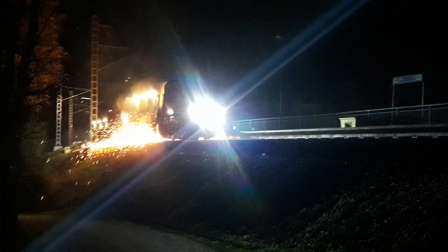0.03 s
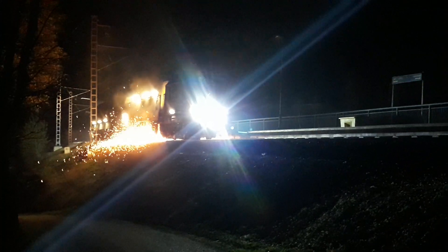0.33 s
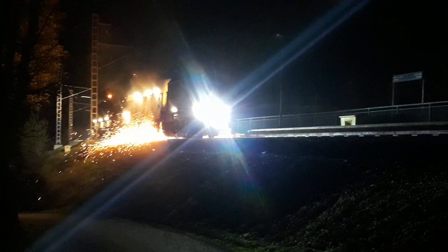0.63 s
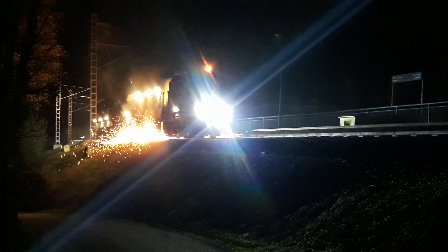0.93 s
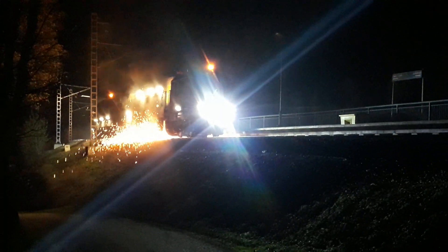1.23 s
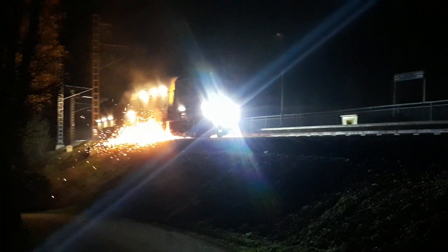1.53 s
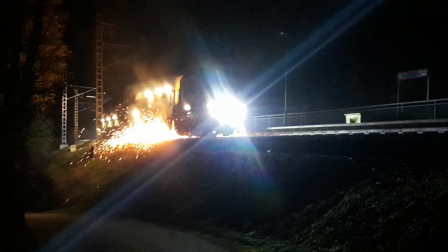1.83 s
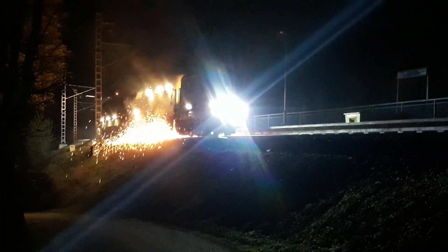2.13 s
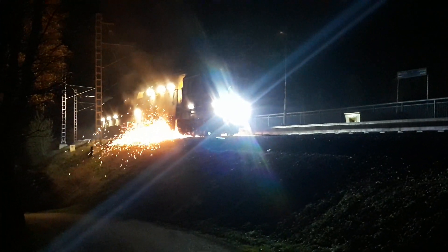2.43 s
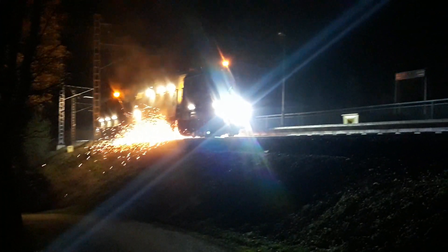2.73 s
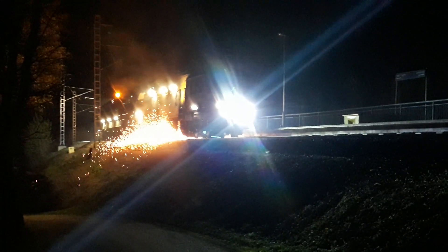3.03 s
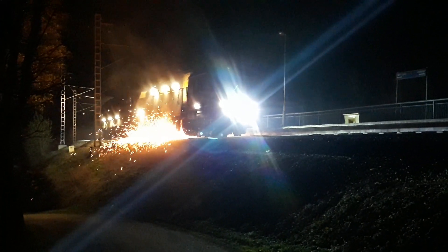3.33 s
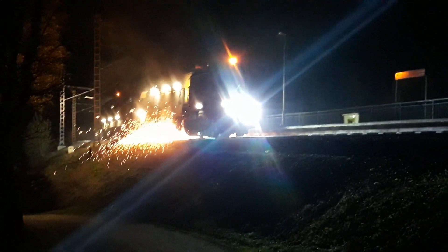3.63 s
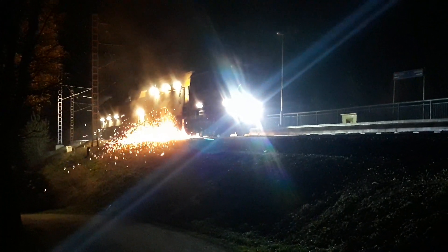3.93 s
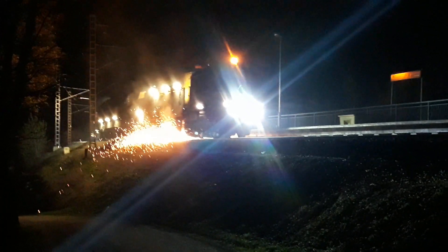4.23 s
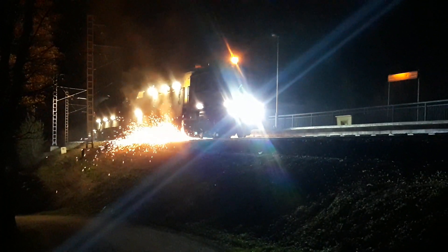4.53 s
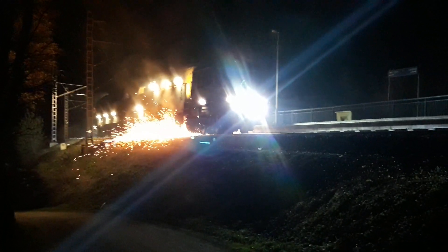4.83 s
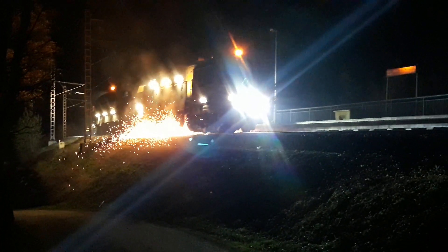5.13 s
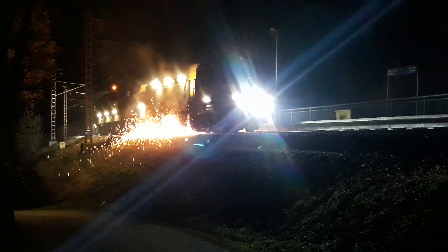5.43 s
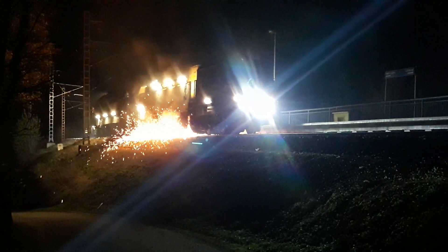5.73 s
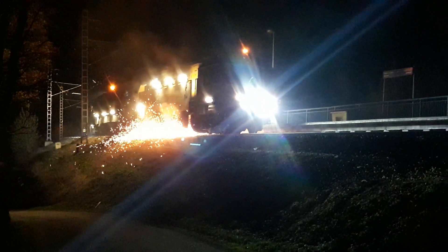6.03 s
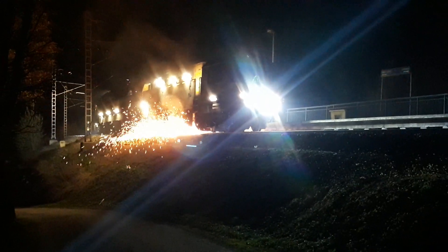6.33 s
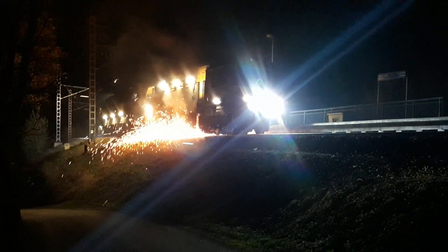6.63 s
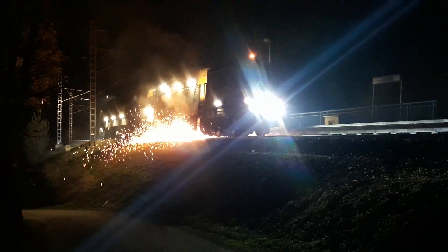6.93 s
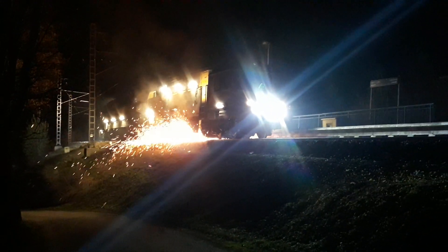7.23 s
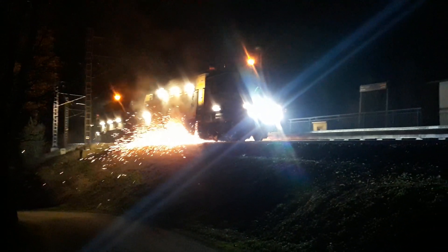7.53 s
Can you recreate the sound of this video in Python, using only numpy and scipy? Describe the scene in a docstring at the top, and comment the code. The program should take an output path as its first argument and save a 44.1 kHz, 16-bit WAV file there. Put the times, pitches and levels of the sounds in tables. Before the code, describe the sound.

A rail grinding train creeps along outdoors, heard from some tens of metres away. Its diesel rattles and whines over humming motors, while the stones make a loud, steady, ringing roar on the rail under a faint fizz of sparks. Thin squeals come and go. Three times a stone bites and the rail rings briefly. After the second bite the engine races slightly, and the grinding peaks near the end.

```python
"""A rail grinding train creeps along an embankment at night, some tens of metres away.
From the start its diesel rattles and whines, a generator and the spindle motors hum, and the stones
roar on the rail under a faint fizz of sparks. Thin squeals come and go; at 2.5 s a stone bites and the
rail sings out. A second bite at 5 s leads into the longest squeal, while the diesel races and its turbo
spools up. Near 7 s the stones bear down hardest, with one more squeal and then a last bite."""
import sys
import numpy as np
from scipy import signal
from scipy.fft import rfft, irfft, next_fast_len
from scipy.io import wavfile
from scipy.ndimage import uniform_filter1d, minimum_filter1d

SR = 44100
rng = np.random.default_rng(int(sys.argv[2]) if len(sys.argv) > 2 else 0)


def dump_mix(stems):
    """Bounce the given channels to the path in sys.argv[1] as a 16-bit WAV at rate SR."""
    frames = np.atleast_2d(stems).T  # one column per channel
    limited = np.clip(frames, -1, 1)  # hard clip at full scale
    pcm = np.round(limited * 32767).astype(np.int16)
    wavfile.write(sys.argv[1], SR, pcm)


N = 333837
T = np.arange(N) / SR

# diesel speed: (time [s], working cycles [1/s])
ENGINE_SPEED = [(0, 15.68), (.25, 15.68), (.6, 15.745), (1.26, 15.7), (1.85, 15.535), (2.3, 15.545),
                (2.78, 15.61), (3.22, 15.53), (3.72, 15.86), (4.1, 15.8), (4.95, 15.84), (5.48, 16.22),
                (5.8, 16.13), (6.3, 15.81), (6.75, 15.66), (7.07, 15.75), (7.57, 15.62)]
# the diesel's standout harmonics: (multiple of the cycle rate, level [dB])
ENGINE_HARMONICS = [(3, -61), (4, -55.5), (6, -35.5), (12, -41.5), (18, -49), (28, -51.5), (31, -39.5),
                    (34, -39), (36, -38.5), (40, -35.5), (43, -44), (44, -33), (59, -38.5), (70, -45.5),
                    (115, -40.5)]
# whines that swell once as the train creeps by:
# multiple of the cycle rate -> (resting level [dB], middle [s], half length [s], rise [dB])
ENGINE_WHINES = {9: (-46.5, 5.5, 2, 7), 42: (-37, 3.5, 3, 9.5), 45: (-37.5, 2.6, 1.8, 4.5),
                 46: (-39.5, 2, 2.2, 10), 48: (-34, 5, 0.4, 8), 50: (-37.5, 3.5, 2, 4),
                 60: (-44.5, 6, 1.7, 6.5), 63: (-42.5, 5.5, 2, 9), 69: (-46.5, 5, 1.5, 9),
                 80: (-38, 5, 1, 6.5), 86: (-37.5, 2, 1.5, 6.5)}
GEAR_MULTIPLE = 78  # of the cycle rate


def amp(db):
    """Decibels to gain."""
    return 10 ** (np.asarray(db) / 20)


def unit(x):
    """Scales to rms 1."""
    return x / np.sqrt(np.mean(abs(x) ** 2) + 1e-20)


def curve(rows):
    """A time table as an automation curve, one value a sample."""
    return np.interp(T, *np.transpose(rows))


def read(points, hz):
    """Reads a spectrum table on a log-frequency axis."""
    f, value = np.transpose(points)
    return np.interp(np.log(hz + 1), np.log(f + 1), value)


def noise(spectrum):
    """Noise of rms 1, coloured by the given spectrum."""
    size = next_fast_len(N)
    eq = amp(read(spectrum, np.fft.rfftfreq(size, 1 / SR)))
    return unit(irfft(rfft(rng.standard_normal(N), size) * eq)[:N])


def drift(rate_hz, size=2048):
    """Slow random modulation of rms 1, with little faster than rate_hz."""
    hz = np.fft.rfftfreq(size, T[-1] / size)
    slow = irfft(rfft(rng.standard_normal(size)) / (1 + (hz / rate_hz) ** 2))
    return np.interp(T, np.linspace(0, T[-1], size), unit(slow))


def swell(rest_db, middle_s, half_s, rise_db):
    """Gain that rises from its resting level, holds, and sinks back."""
    return amp(rest_db + rise_db * np.exp(-((T - middle_s) / half_s) ** 4))


def angle(hz):
    """Phase of something that turns hz times a second."""
    return 2 * np.pi * np.cumsum(hz * np.ones(N)) / SR


def tone(phase, scatter, rate_hz):
    """A wavering tone of rms near 1: direct sound plus a share, scatter, that comes by shifting paths."""
    phase = (phase + rng.uniform(0, 2 * np.pi)) % (2 * np.pi)
    in_phase = np.sqrt(2 * (1 - scatter)) + np.sqrt(scatter) * drift(rate_hz)
    return in_phase * np.cos(phase) + np.sqrt(scatter) * drift(rate_hz) * np.sin(phase)


def resonate(x, hz, width_hz):
    """A two-pole resonance that follows the curve hz."""
    turn = np.exp(1j * angle(hz))
    r = np.exp(-np.pi * width_hz / SR)
    return (turn * signal.lfilter([(1 - r) ** 2], [1, -2 * r, r * r], x / turn)).real


def overspeed(rated_cycles_per_s=15.7):
    """Percent by which the diesel runs above its rated speed."""
    return 100 * (curve(ENGINE_SPEED) / rated_cycles_per_s - 1)


def whistle():
    """A faint, unsteady high whistle swells and recedes."""
    gain = swell(rest_db=-68.5, middle_s=3.5, half_s=3, rise_db=4.5)
    return gain * tone(angle(6850 + 8 * drift(.6)), scatter=.9, rate_hz=20)


def sparks():
    """Countless tiny sparks merge into a smooth, faint fizz."""
    # colour of the fizz: (frequency [Hz], relative level [dB])
    fizz = [(5000, -15), (7000, -4.5), (7800, -9.5), (8600, 0.5), (9700, -26), (11000, -5.5), (12800, 3.5),
            (14200, 0.5), (15600, 4.5)]
    return amp(-50.5 + .5 * drift(.7)) * noise(fizz)


def motors(spindle):
    """A bed of hum: the steady generator and the spindle motors that it feeds."""
    # generator partials: (frequency [Hz], level [dB])
    partials = [(47, -65.5), (62.6, -60), (78.3, -43.5), (109.6, -48), (156.5, -40.5), (199, -43)]
    generator = sum(amp(db) * tone(angle(hz), scatter=.075, rate_hz=1) for hz, db in partials)
    spindle_gain = swell(rest_db=-35, middle_s=5, half_s=1, rise_db=4)
    return generator + spindle_gain * tone(spindle, scatter=.24, rate_hz=5.5)


def air_rush(cycle, approach_db_per_s=.3633):
    """Exhaust and cooling air throb with the engine and grow as the train comes nearer."""
    # colour of the rush: (frequency [Hz], relative level [dB])
    rush = [(20, -48.5), (35, -38.5), (55, -27), (90, -20.5), (115, -13.5), (150, -9), (190, -1),
            (250, -11), (350, -13), (450, -10.5), (560, 0.5), (720, -1.5), (900, -7), (1400, -6),
            (2200, -16), (4000, -53)]
    throb = 1 + .1 * np.cos(cycle) + .15 * np.cos(2 * cycle) + .15 * np.cos(4 * cycle)
    return amp(-23.5 + approach_db_per_s * T) * noise(rush) * throb


def fan(cycle, belt_ratio=13.58):
    """The belt-driven cooling fan drones at a pitch tied to the engine."""
    gain = swell(rest_db=-43, middle_s=2.1, half_s=2, rise_db=8.5)
    return gain * tone(belt_ratio * cycle, scatter=.18, rate_hz=2.2)


def turbo(hz_per_percent=45):
    """The turbocharger sings, fading in and out a little, and spools up when the diesel races."""
    hz = 1946 + hz_per_percent * np.maximum(overspeed(), 0) + 9 * drift(2.5)
    return amp(-27.3 + 1.6 * drift(2.5)) * tone(angle(hz), scatter=.25, rate_hz=9)


def clatter(cycle, size=4096, count=290):
    """Every working cycle repeats the same rattle; shifting paths slowly recolour it."""
    # colour of the rattle: (frequency [Hz], level per harmonic [dB])
    colour = [(45, -66), (120, -48), (170, -46), (300, -57), (420, -55), (560, -42.5), (740, -39),
              (860, -42.5), (1300, -44.5), (1550, -46.5), (1780, -40), (2050, -45), (2500, -38.5),
              (2900, -48.5), (3500, -61.5), (4500, -91.5)]
    multiple = np.arange(1, count)
    gain = amp(read(colour, multiple * curve(ENGINE_SPEED).mean()))
    voiced_apart = [GEAR_MULTIPLE, *ENGINE_WHINES, *(k for k, _ in ENGINE_HARMONICS)]
    gain[np.isin(multiple, [1, 2, *voiced_apart])] = 0
    place = (cycle / (2 * np.pi) % 1) * size

    def rattle():
        harmonics = gain * np.exp(2j * np.pi * rng.random(count - 1))
        one_cycle = irfft(np.r_[0, harmonics], size) * size / np.sqrt(2)
        return np.interp(place, np.arange(size + 1), np.r_[one_cycle, one_cycle[0]])
    return .85 * rattle() + .4 * (drift(1) * rattle() + drift(1) * rattle())


def diesel(cycle, firing_multiple=6):
    """The firing note and those below hold steady; higher ones and clatter follow the load; whines swell."""
    load = amp(-.06 + .13 * overspeed())
    engine = load * clatter(cycle)
    for k, db in ENGINE_HARMONICS:
        if k <= firing_multiple:
            engine += amp(db) * tone(k * cycle, scatter=.012, rate_hz=1.5)
        else:
            engine += load * amp(db - .7) * tone(k * cycle, scatter=.27, rate_hz=1.2)
    for k, shape in ENGINE_WHINES.items():
        engine += swell(*shape) * tone(k * cycle, scatter=.22, rate_hz=5)
    return engine


def gears(cycle):
    """The gear whine, locked to the engine, surges and falls back."""
    # fader ride of the whine: (time [s], level [dB])
    ride = [(0, -33.5), (1, -22.5), (1.9, -27), (2.8, -28.5), (4.1, -29), (4.9, -27.5), (5.2, -38),
            (5.6, -27), (6.1, -33.5), (6.5, -26.5), (7.57, -32)]
    return amp(curve(ride)) * tone(GEAR_MULTIPLE * cycle, scatter=.25, rate_hz=9)


def squeal(spindle, pitch_hz=5503):
    """Now and then one stone sings at its own pitch, chopped by the spindle into a row of sidebands."""
    # squeals, each one arch of level: (start [s], length [s], top level [dB])
    squeals = [(.33, .5, -51.5), (.9, .32, -55), (3.42, 0.74, -48.5), (4.2, 0.3, -53), (4.47, 0.39, -45.5),
               (4.86, 0.33, -48), (5.14, 1.12, -41.5), (6.6, .34, -53), (7.02, 0.31, -43)]
    # partials one spindle hum apart, from one step below the pitch: (relative level [dB])
    partials = [-14, 0, -13, -12, -11, -14, -15, -18]
    # hiss around the squeal: (frequency [Hz], relative level [dB])
    hiss = [(3500, -30), (5100, -5), (5500, 3), (6200, -4), (7500, -20), (9000, -40.5)]
    envelope = np.zeros(N)
    for start, length, db in squeals:
        progress = np.clip((T - start) / length, 0, 1)
        envelope += amp(db) * np.sin(np.pi * progress) ** .65
    phase = angle(pitch_hz + 5 * drift(12))
    song = sum(amp(db) * tone(phase + step * spindle, scatter=.22, rate_hz=28)
               for step, db in enumerate(partials, start=-1))
    return envelope * (song + amp(-6) * noise(hiss))


def bites():
    """A stone digs in for a moment and one mode of the rail sings out of the roar."""
    # metallic accents: (time [s], pitch [Hz], top level [dB], half length [s])
    accents = [(2.5, 2425, -21.5, 0.12), (5.05, 2444, -20, .06), (7.52, 2410, -19.5, 0.059)]
    return sum(amp(db) * np.exp(-((T - time) / half) ** 2) * tone(angle(hz), scatter=.21, rate_hz=15)
               for time, hz, db, half in accents)


def grinding(cycle, edge_fade_db_per_s=1):
    """Grit scrapes the rail and sets it ringing; the harder the stones press, the more ring stands out."""
    # how hard the stones bear on the rail: (time [s], level [dB])
    pressure = [(0, -16), (.5, -16), (1.5, -17.5), (2.6, -16.5), (3.3, -16.5), (3.55, -17.5), (4, -17),
                (4.2, -19.3), (4.4, -16), (5, -16.5), (5.25, -17.5), (5.9, -18), (6.2, -16), (6.8, -15),
                (7.05, -13.5), (7.35, -17.5), (7.57, -18.5)]
    # centre of the rail's ring: (time [s], frequency [Hz])
    ring_centre = [(0, 2576), (2.6, 2550), (6.2, 2402), (7.57, 2395)]
    # broad body of the scrape: (frequency [Hz], relative level [dB])
    scrape = [(500, -46.5), (1200, -7), (1550, -6), (1780, 3), (1890, -0.5), (2150, 1.5), (2600, -0.5),
              (2950, -3.5), (3250, -12.5), (3700, -22.5), (4300, -26.5), (4900, -30), (6100, -28.5),
              (6800, -39.5), (7600, -49.5), (10000, -73.5)]
    # gritty top edge, which turns away as the train moves on: (frequency [Hz], relative level [dB])
    grit = [(2300, -41), (3000, 3.5), (3700, -6), (4300, -17), (5200, -30.5), (8000, -59)]
    contact_db = curve(pressure) + .3 * drift(5.5) + .2 * np.cos(cycle)  # uneven rail, engine shake
    tilt_db = .45 * (contact_db - contact_db.mean())
    ring = amp(-3 + tilt_db) * unit(resonate(noise(scrape), curve(ring_centre), width_hz=420))
    edge = amp(-34.5 - edge_fade_db_per_s * T) * noise(grit)
    body = amp(-2 - tilt_db) * noise(scrape)
    return amp(contact_db) * (body + ring) + edge


def scene():
    """The whole machine in mono; the engine's cycle and the spindle hum follow the diesel's speed."""
    cycle = angle(curve(ENGINE_SPEED))
    spindle = angle(173.7 + .7 * overspeed())
    machinery = diesel(cycle) + gears(cycle) + air_rush(cycle) + fan(cycle) + turbo() + motors(spindle)
    return (machinery + grinding(cycle) + bites() + squeal(spindle) + whistle() + sparks())[None]


def record(dry, ceiling=.96, cutoff_hz=15750):
    """A smooth limiter holds the rare peaks just under full scale; a steep low-pass trims the top."""
    needed_gain = np.minimum(1, ceiling / (abs(dry) + 1e-9))
    held_gain = minimum_filter1d(needed_gain, size=257)
    gain = uniform_filter1d(uniform_filter1d(held_gain, size=129), size=129)
    lowpass = signal.firwin(801, cutoff_hz, window=("kaiser", 9), fs=SR)
    return signal.oaconvolve(dry * gain, lowpass[None], "same")


dry = scene()
out = record(dry)
dump_mix(out)
```